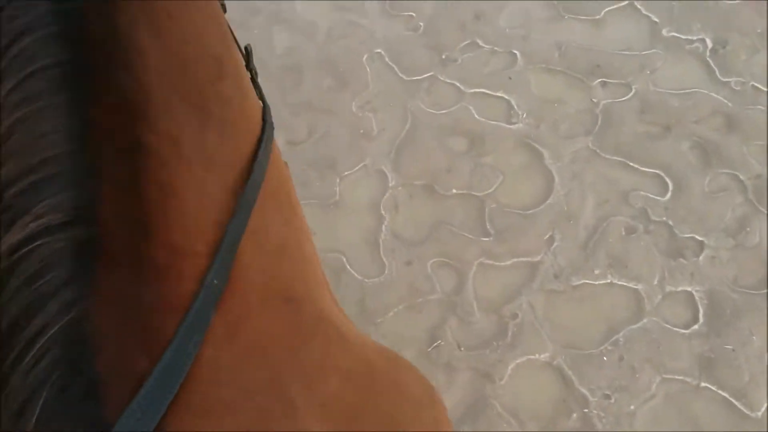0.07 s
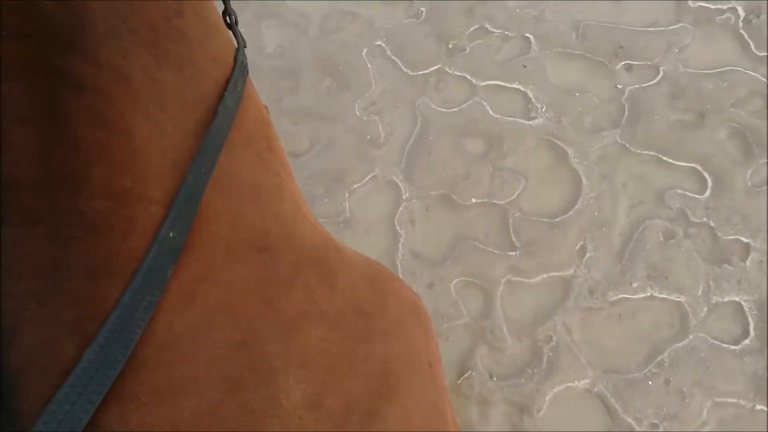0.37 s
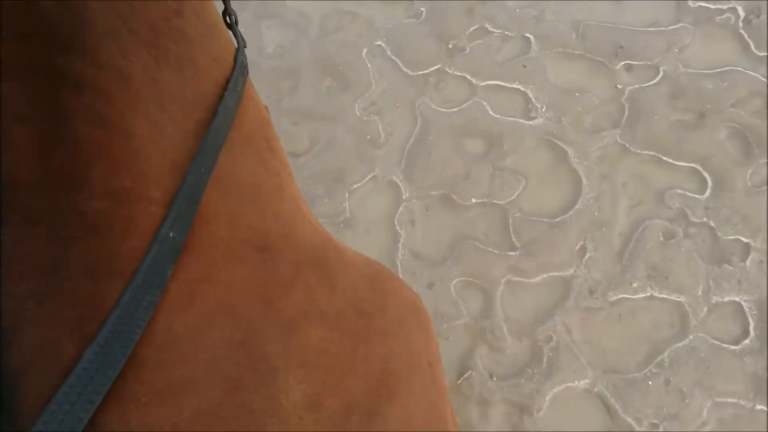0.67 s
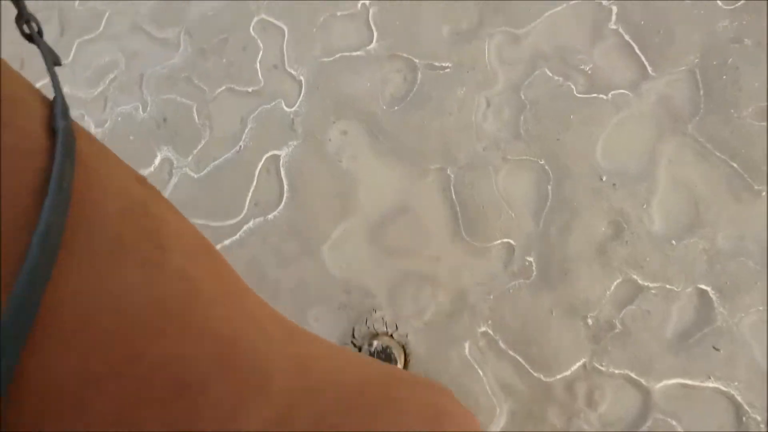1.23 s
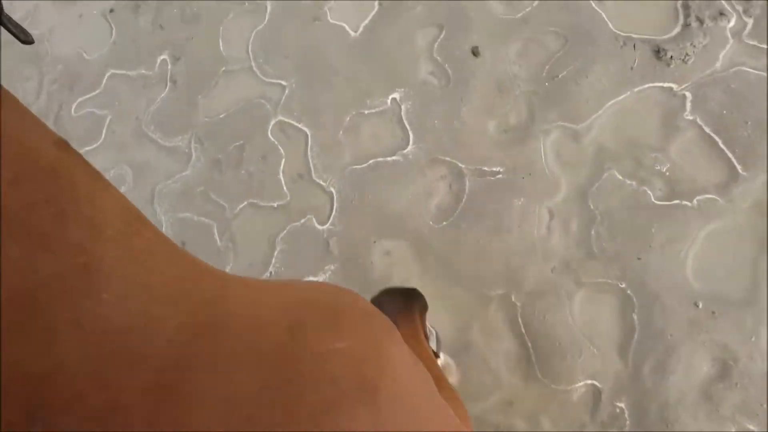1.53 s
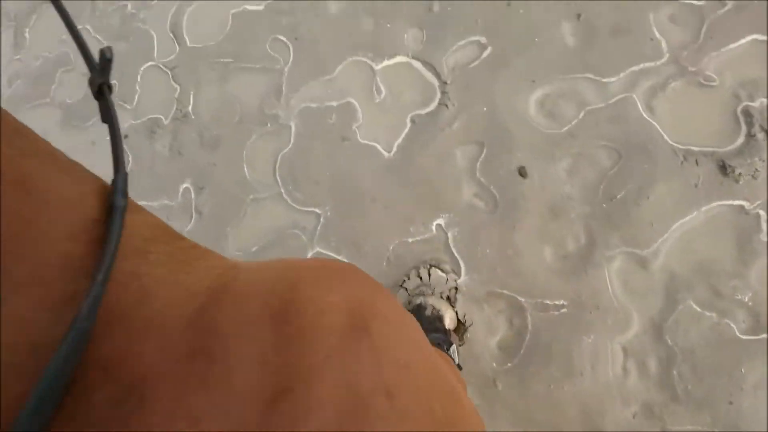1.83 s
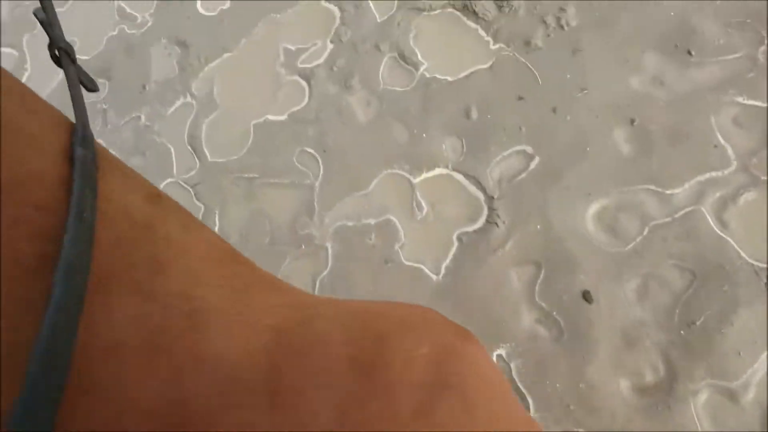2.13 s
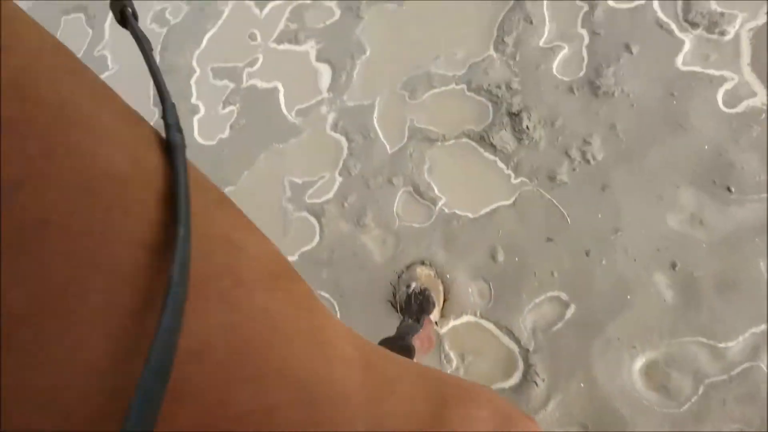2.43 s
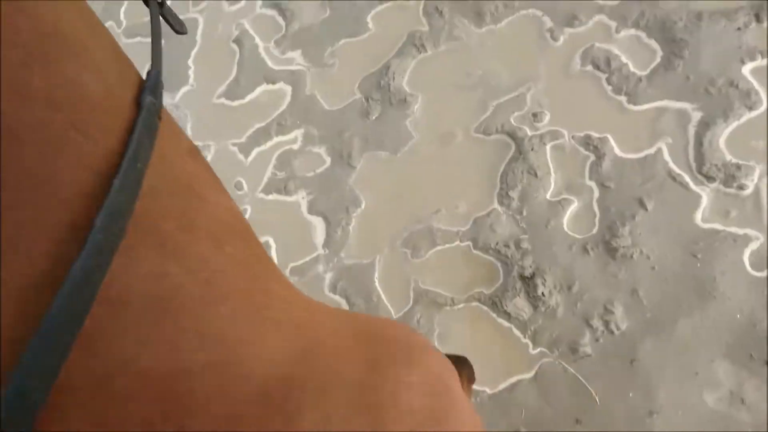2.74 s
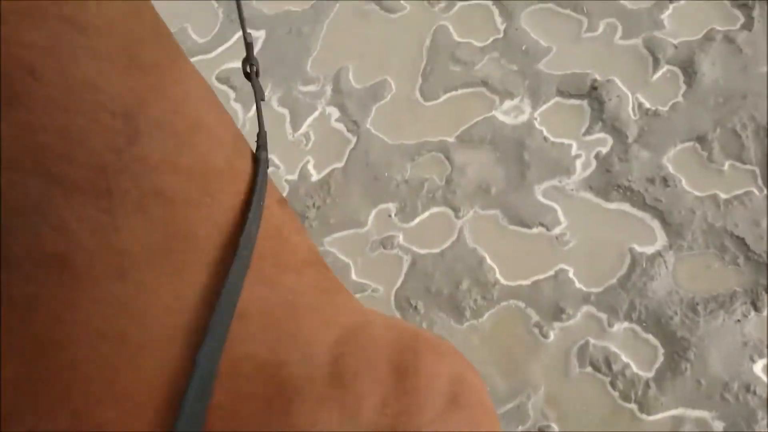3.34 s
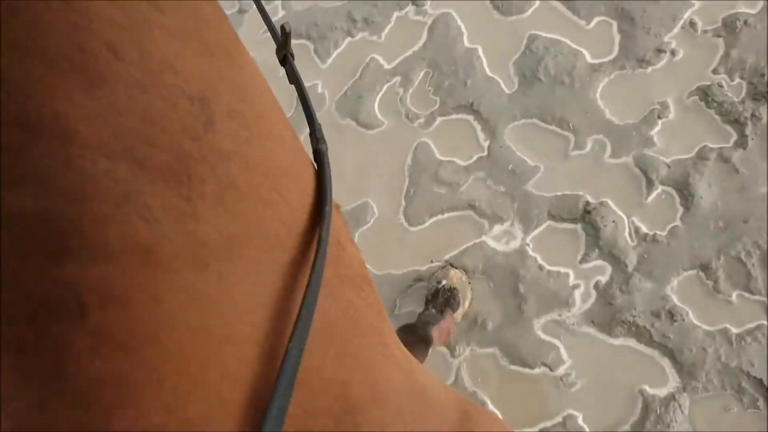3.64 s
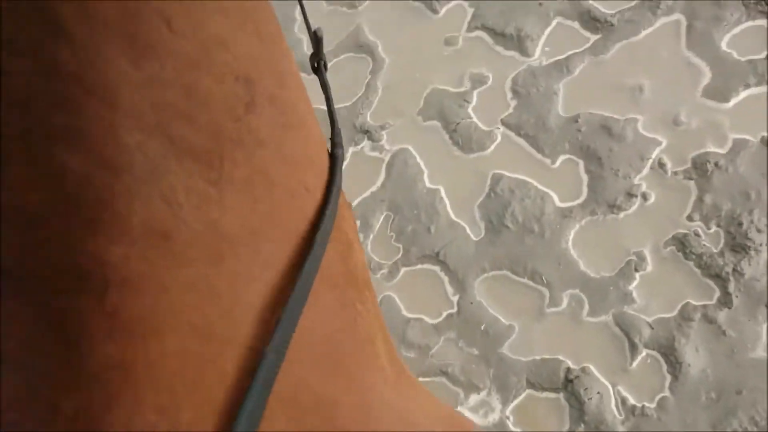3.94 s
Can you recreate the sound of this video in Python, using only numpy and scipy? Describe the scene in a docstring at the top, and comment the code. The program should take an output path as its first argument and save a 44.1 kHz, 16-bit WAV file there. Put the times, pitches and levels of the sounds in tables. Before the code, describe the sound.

Hooves walking in wet mud, sucking and plopping, with faint birds and a distant engine hum.

```python
"""A horse walks through wet mud, outdoors, heard from a stereo microphone at the saddle.
From the start, small birds chirp on the right over low rumbling air and a distant engine's hum.
Soft steps come first: the ground thuds, and hooves pulling free suck, crackle and plop.
At 1.2 s a fore hoof slaps shut a pocket of air and throws slurry. The engine swells at 2 and 3 s;
two more slaps land at 2.6 and 3.6 s, and the birds swing toward the middle as the rider turns."""
import sys
import numpy as np
from scipy import signal
from scipy.io import wavfile

SR = 44100
rng = np.random.default_rng(int(sys.argv[2]) if len(sys.argv) > 2 else 0)


def materialize(psi):
    """Save the field psi as 16-bit PCM at rate SR to the path in sys.argv[1].

    A 1-D psi becomes a single channel; in a 2-D psi each row is a channel.
    """
    bounded = np.clip(np.atleast_2d(psi).T, -1, 1)
    quanta = np.round(bounded * 32767).astype(np.int16)
    wavfile.write(sys.argv[1], SR, quanta)


N = 176400
T = np.arange(N) / SR


def from_db(db):
    """Decibels to gain."""
    return 10 ** (np.asarray(db) / 20)


def unit_rms(x):
    """Scale to unit power."""
    return x / np.sqrt(np.mean(x ** 2) + 1e-20)


def at_hz(points, hz):
    """Read a spectrum on a log-frequency axis."""
    freqs, values = np.transpose(points)
    return np.interp(np.log(hz), np.log(freqs), values)


def in_time(points):
    """Read a curve at every sample."""
    return np.interp(T, *np.transpose(points))


def pan(db):
    """Left and right gains of mean 1; db is left minus right."""
    gains = from_db([[db / 2], [-db / 2]])
    return gains / gains.mean()


def drift(per_s, size=N):
    """Smooth random wander of spread about 1."""
    return np.interp(np.arange(size) / SR * per_s, np.arange(4096), rng.standard_normal(4096))


def stereo_pair(a, b, likeness):
    """Two unrelated signals become a partly alike left and right."""
    likeness = np.clip(likeness, -.99, .99)
    mid, side = np.sqrt(1 + likeness) * a, np.sqrt(1 - likeness) * b
    return np.array([mid + side, mid - side])


def add(out, start_s, x):
    """Mix a sound in at start_s."""
    i = int(round(start_s * SR))
    lo, hi = max(i, 0), min(i + x.shape[-1], N)
    out[..., lo:hi] += x[..., lo - i:hi - i]


def echoes(x, t60_s):
    """Diffuse scatter from the surroundings, different on each side of the microphone."""
    t = T[:SR // 2]
    tail = rng.standard_normal((2, len(t))) * from_db(-60 * t / t60_s) * (1 - np.exp(-t / .008))
    return signal.fftconvolve(x, tail / np.sqrt(np.sum(tail ** 2) / 2), axes=1)[:, :N]


# open air all around: freq_hz, band_level_db
AIR_SPECTRUM = [(40, -77.5), (60, -62), (95, -55.5), (170, -52.5), (260, -59.5), (400, -66), (750, -67),
                (1150, -60.5), (1700, -64), (2500, -63.5), (4500, -63), (6300, -70.5), (8500, -82),
                (15000, -84.5)]
# how alike it is on the two sides of the microphone: freq_hz, correlation
AIR_CORRELATION = [(60, 0.75), (300, 0.98), (700, 0.59), (1500, 0)]
# where it sits, mostly to the right: freq_hz, left_minus_right_db
AIR_BALANCE = [(60, -6.5), (200, -1.5), (1000, -5.5), (3000, -7.5), (6000, 0), (12000, 2)]


def air():
    """Outdoor rumble and faint hiss in third-octave bands that flicker on their own."""
    out, white = 0, rng.standard_normal((2, 2, N))
    for k, hz in enumerate(1000 * 2 ** (np.arange(-15, 13) / 3)):
        bandpass = signal.butter(2, [hz / 2 ** (1 / 6), hz * 2 ** (1 / 6)], "band", fs=SR, output="sos")
        band = stereo_pair(*signal.sosfilt(bandpass, white[k % 2]), at_hz(AIR_CORRELATION, hz))
        level_db = at_hz(AIR_SPECTRUM, hz) + 2.36 * drift(per_s=14)
        out += unit_rms(band) * pan(at_hz(AIR_BALANCE, hz)) * from_db(level_db)
    return out


# the far engine's slowly sinking note: time_s, pitch_hz
ENGINE_PITCH = [(1.2, 72), (1.85, 69), (3.75, 68.5), (4, 66)]
# its swells at the microphone: time_s, level_db
ENGINE_LEVEL = [(1.3, -53), (1.9, -50.5), (2.05, -45), (2.56, -46.5), (2.82, -53), (3.07, -41),
                (3.58, -46.5), (3.75, -42), (4, -44.5)]
# its harmonics: pitch_multiple, relative_db
ENGINE_HARMONICS = [(1, 1), (2, -13.5), (3, -23), (4, -25)]


def engine():
    """An engine far off to the right: a low hum with weak, wavering overtones."""
    phase = 2 * np.pi * np.cumsum(in_time(ENGINE_PITCH)) / SR
    hum = sum(from_db(db + 1.3 * k * drift(per_s=14)) * np.sin(k * phase) for k, db in ENGINE_HARMONICS)
    return np.sqrt(2) * hum * from_db(in_time(ENGINE_LEVEL)) * pan(db=-6.5)


# the outline of one chirp: time_s, pitch_hz, relative_db
CHIRP_SHAPE = [(0, 3490, 0), (.009, 4300, -4.5), (.018, 4730, 0), (.028, 4735, -6), (.038, 3670, 6.5),
               (0.042, 3920, 1), (0.049, 3420, -6.5), (.062, 4050, 1.5), (.072, 4500, -3.5),
               (.084, 3500, 2), (.10, 2876, -11.5)]


def chirp(level_db, pitch_ratio, distance_db):
    """A nearly pure tone that arches twice, with small kinks of its own, blurred by distance."""
    times, pitches, shape_db = np.transpose(CHIRP_SHAPE)
    t = T[:SR // 9]
    blur_hz = (70 + 17 * distance_db) * drift(900, len(t))
    kinks_hz = 80 * drift(130, len(t))
    hz = pitch_ratio * np.interp(t, times, pitches) + blur_hz + kinks_hz
    waver_db = 3.4 * drift(200, len(t))
    gain = from_db(level_db + np.interp(t, times, shape_db) + waver_db) * signal.windows.tukey(len(t), .1)
    return np.sqrt(2) * gain * np.sin(2 * np.pi * np.cumsum(hz) / SR)


# small birds, near and far: start_s, level_db, pitch_ratio
BIRD_CALLS = [(0.02, -60, 1.14), (0.299, -58, 1.11), (.415, -55, 1.12), (0.471, -62, 1.13),
              (0.71, -52, 0.96), (.85, -52.5, 1.01), (0.964, -41, 1), (1.404, -56.5, 1.28),
              (1.504, -54, 1.27), (1.555, -38.5, 0.96), (1.667, -55.5, 1.22), (1.807, -51.5, 1.03),
              (2.205, -51.5, 0.98), (2.315, -45, 0.97), (2.367, -52.5, 1.17), (2.73, -56, 1.05),
              (2.848, -53.5, 1.27), (3.038, -43.5, 1.045), (3.327, -52, 1.276), (3.624, -41, 1),
              (3.788, -52.5, 1.1), (3.945, -47, 0.99)]
# they swing toward the middle as the rider turns: time_s, left_minus_right_db
BIRD_BALANCE = [(2.4, -9.5), (3.0, -4.5)]
NEAR_BIRD_DB, RIGHT_LAG_S = -45, .0004


def birds():
    """Calls from the right; the fainter the bird, the further off, and the more it dissolves in scatter."""
    direct, scattered = np.zeros((2, N))
    for start_s, level_db, pitch_ratio in BIRD_CALLS:
        distance_db = max(NEAR_BIRD_DB - level_db, 0)
        scatter = from_db(-9 + .7 * distance_db)
        call = chirp(level_db, pitch_ratio, distance_db) / np.hypot(1, scatter)
        add(direct, start_s, call)
        add(scattered, start_s, scatter * call)
    sides = from_db(np.outer([.5, -.5], in_time(BIRD_BALANCE)))
    lagged = np.interp(T - RIGHT_LAG_S, T, direct)
    return sides * np.array([direct, lagged]) + echoes(sides * scattered, t60_s=.3)


# the colour of bursting mud: freq_hz, band_level_db
MUD_SPECTRUM = [(350, -5), (700, -13.5), (1050, -3), (1450, -3.5), (1780, -5.5), (2400, 0), (4000, 0.5),
                (6000, -15), (9000, -23), (15000, -38)]
# how it reaches the microphone: freq_hz, left_minus_right_db
MUD_BALANCE = [(1200, -0.5), (2500, -7), (4500, -6.5), (8000, 2.5), (12000, 31)]
MUD_Q, RING_WIDTH_OCTAVES, TREBLE_HZ, SQUELCH_BURSTS_PER_S = 6.7, .079, 4730, 2200
SPRAY_Q, SPRAY_FROM_HZ, SPRAY_LAG_S = 1.8, 6500, .0019


def mud_bursts(envelope, per_s, ring_hz, ring_db=8.5, treble_db=0):
    """Tiny bursts ring the mud's small cavities; the finest spray lags behind as a hiss."""
    n, centres = len(envelope), np.geomspace(350, 15000, 26)
    density = per_s / SQUELCH_BURSTS_PER_S
    bursts = (rng.random(n) < per_s / SR) * from_db(3.6 * np.minimum(rng.exponential(1, n), 3))
    drive = (bursts + .073 * density) * envelope  # a little noise fills the gaps
    pole = np.exp(-1 / (SPRAY_LAG_S * SR))
    spray = signal.lfilter([1 - pole], [1, -pole], envelope) * density
    ring = np.exp(-(np.log2(centres / ring_hz) / RING_WIDTH_OCTAVES) ** 2 / 2)
    shelf = 1 / (1 + (TREBLE_HZ / centres) ** 4)
    patchy_db = 4 * rng.standard_normal(len(centres))
    gains = from_db(at_hz(MUD_SPECTRUM, centres) + ring_db * ring + treble_db * shelf + patchy_db)
    cavities_hz = centres * rng.uniform(.95, 1.05, len(centres))
    out = 0
    for hz, gain in zip(cavities_hz, gains / np.linalg.norm(gains)):
        is_spray = hz > SPRAY_FROM_HZ
        kicks = stereo_pair(*rng.standard_normal((2, n)), likeness=.39) * (drive + spray * is_spray)
        cavity = np.concatenate(signal.iirpeak(hz, SPRAY_Q if is_spray else MUD_Q, SR))
        ringing = unit_rms(signal.sosfilt([cavity, cavity], kicks + 1e-18))
        out += gain * pan(at_hz(MUD_BALANCE, hz)) * ringing
    return out * np.sqrt(np.mean(envelope ** 2))


# mud creeps under a loaded hoof, faint from the saddle: centre_s, width_s, crackle_db, sizzle_db
OOZE_SWELLS = [(0.546, 0.11, -57, -60.5), (1.446, 0.037, -58.5, -62), (1.69, .07, -57, -59),
               (1.989, 0.025, -60.5, -56), (2.371, 0.12, -60, -59), (2.715, .05, -57.5, -59.5),
               (2.936, 0.098, -54, -56.5), (3.281, 0.06, -61, -59.5), (3.627, 0.075, -56.5, -58),
               (3.93, 0.084, -57.5, -58.5)]


def ooze():
    """Slow sticky crackle and a fine wet sizzle swell and fade as the weight shifts."""
    crackle, sizzle = np.zeros((2, N))
    for centre_s, width_s, crackle_db, sizzle_db in OOZE_SWELLS:
        swell = np.exp(-((T - centre_s) / width_s) ** 2 / 2)
        crackle += from_db(crackle_db) * swell
        sizzle += from_db(sizzle_db - 3) * swell
    return (mud_bursts(crackle, per_s=330, ring_hz=2036)
            + mud_bursts(sizzle, per_s=330, ring_hz=TREBLE_HZ, ring_db=0, treble_db=27))


def damped_tone(hz, t60_s, rise_s, glide_per_s=0):
    """A tone rings and dies; with a glide it rises in pitch like a closing pocket of air."""
    t = T[:SR // 3]
    tone = np.sin(2 * np.pi * hz * (t + glide_per_s * t * t / 2))
    return tone * (1 - np.exp(-t / rise_s)) * from_db(-60 * t / t60_s)


# the ground below the horse: start_s, level_db, pitch_hz
GROUND_THUDS = [(.183, -37.5, 161), (1.227, -33, 190), (0.303, -30.5, 77.3), (.575, -30.5, 155),
                (1.434, -28, 99.4), (1.52, -30.5, 110), (1.585, -32, 112), (1.665, -35.5, 179.6),
                (2.299, -37, 168), (3.242, -36, 152)]


def thuds():
    """Soft ground gives under the weight with a low, rounded note."""
    out = np.zeros(N)
    for start_s, level_db, hz in GROUND_THUDS:
        add(out, start_s, from_db(level_db + 4.5) * damped_tone(hz, t60_s=.12, rise_s=.016))
    return out


# larger bubbles around the hooves: start_s, level_db, pitch_hz
BUBBLE_PLOPS = [(.577, -39, 431), (.753, -39.5, 313), (.828, -41.5, 458), (.868, -39, 390),
                (1.010, -41.5, 570), (1.033, -39.5, 447.2), (2.628, -39, 733.6), (1.133, -41, 570),
                (1.310, -47, 431), (1.576, -38.5, 518), (3.41, -44, 400), (1.896, -43, 556),
                (1.930, -40, 445), (2.065, -37, 440), (2.120, -44, 495), (2.302, -39.5, 437),
                (2.814, -38, 469), (2.966, -41, 464), (3.026, -42, 398), (3.239, -43, 444),
                (3.605, -30, 714), (3.738, -45.5, 413), (3.846, -43, 456)]
BUBBLE_GLIDE_PER_S = 6.2


def plops():
    """Each bubble rings briefly with one weak overtone, rising as it closes."""
    out = np.zeros(N)
    for start_s, level_db, hz in BUBBLE_PLOPS:
        low, high = [damped_tone(f, t60_s=.022, rise_s=.00067, glide_per_s=BUBBLE_GLIDE_PER_S)
                     for f in (hz, 1.58 * hz)]
        add(out, start_s, from_db(level_db + 6.5) * (low - from_db(-13.5) * high))
    return out


# wet mud bursts into tiny bubbles, a horse's height below the microphone:
# peak_s, level_db, rise_s, fall_s, ring_hz, treble_db, left_minus_right_db
MUD_SQUELCHES = [(0.184, -53, 0.00084, 0.0037, 11000, 38, -3), (0.239, -31, 0.0016, 0.0028, 1205, -10, 2),
                 (.254, -31.5, 0.009, 0.01, 2070, 20, -3.5), (.578, -42, 0.00073, 0.0097, 1930, -6, 5),
                 (0.619, -39, 0.00079, 0.0053, 1950, -6, 4), (.828, -38, 0.00044, 0.0028, 3160, 10, 5),
                 (0.8562, -36.5, .0006, 0.0017, 2850, 13, 3), (0.867, -28, 0.001, 0.0012, 1230, 8.5, -1),
                 (1.133, -42, 0.0005, 0.0022, 2630, 3, -2), (1.228, -29, 0.0032, 0.0086, 1380, 10.5, 7),
                 (1.2399, -24.5, 0.00038, 0.0012, 3050, -12, -20), (1.258, -30.5, 0.01, 0.0032, 2890, 0, 1),
                 (1.2787, -26.5, 0.00089, 0.0021, 1450, 12, 2.5),
                 (1.286, -29, 0.00038, 0.0014, 2820, -6, -5), (1.296, -30.5, .0005, 0.0016, 3030, 0, 4),
                 (1.645, -42.5, 0.0018, 0.042, 1368, -8, -1), (1.673, -29.5, 0.0025, 0.0033, 2670, 2, -3.5),
                 (1.896, -40, .0005, 0.0019, 1394, -3, 3), (1.930, -41.5, 0.00032, 0.003, 2650, -1, 10),
                 (2.3025, -31.5, 0.00076, 0.0043, 2080, 11.5, -0.5),
                 (2.419, -40.5, 0.00054, 0.0026, 2920, 20, -1), (2.627, -25.5, 0.0018, 0.0071, 976, 15, 4),
                 (2.642, -36, 0.0064, 0.018, 1400, 12, -5), (2.666, -26.5, 0.00084, 0.007, 1230, 10, 0),
                 (2.6769, -35.5, 0.00082, 0.0022, 1100, 27, 0), (2.688, -33, 0.003, 0.015, 1340, 11, 1.5),
                 (2.899, -34.5, 0.00029, 0.0035, 2970, 25, -3.5),
                 (2.969, -35, 0.0008, 0.007, 1450, 21.5, -3), (3.246, -37.5, 0.0083, 0.0093, 1310, 19, 2),
                 (3.56, -31, 0.0016, 0.004, 2520, 12, 4), (3.588, -37, 0.02, 0.031, 1380, 4, 2),
                 (3.607, -25, 0.00063, 0.0043, 1340, -12, 1), (3.882, -42.5, 0.0087, 0.02, 1400, 13, -1),
                 (3.8961, -30.5, 0.00039, 0.0024, 3500, 22.5, 1.5)]


def squelches():
    """Each squelch swells and dies as a spray of bursts; an abrupt one is mostly one bubble popping."""
    out, lead_s = np.zeros((2, N)), .05
    t = T[:SR // 6] - lead_s
    for peak_s, level_db, rise_s, fall_s, ring_hz, treble_db, pan_db in MUD_SQUELCHES:
        envelope = np.exp(np.minimum(t / rise_s, -t / fall_s))
        gain = from_db(level_db - 1) * pan(pan_db)
        slurry = mud_bursts(envelope, SQUELCH_BURSTS_PER_S, ring_hz, treble_db=treble_db)
        add(out, peak_s - lead_s, gain * slurry)
        abruptness = np.exp(-rise_s / .0015)
        pop = from_db(17) * damped_tone(ring_hz, t60_s=.006, rise_s=.0009, glide_per_s=BUBBLE_GLIDE_PER_S)
        add(out, peak_s, gain * pan(at_hz(MUD_BALANCE, ring_hz)) * abruptness * pop)
    return out


# fore hooves land flat, just ahead of the saddle: start_s, level_db, pitch_hz, t60_s, thud_relative_db
HOOF_SLAPS = [(1.2265, -20, 423, 0.02, 0), (2.6266, -19, 341, 0.02, -26.5), (3.5613, -22, 437, 0.019, -22)]
# the ring of the trapped air: pitch_ratio, relative_db, t60_ratio
POCKET_MODES = [(1, 2.5, 1.0), (1.3, -12, 1.2), (2.2, -6, .9), (2.8, -13, 1.3)]


def slaps():
    """A hoof shuts a pocket of air, which rings and rises in pitch over a short thud."""
    out = np.zeros(N)
    for start_s, level_db, hz, t60_s, thud_db in HOOF_SLAPS:
        for pitch_ratio, mode_db, t60_ratio in POCKET_MODES:
            mode = damped_tone(hz * pitch_ratio, t60_s * t60_ratio, rise_s=.0015, glide_per_s=13.5)
            add(out, start_s, from_db(level_db + mode_db + 5) * mode)
        add(out, start_s, from_db(level_db + thud_db) * damped_tone(hz=200, t60_s=.031, rise_s=.0015))
    return out


def scene():
    """Close steps with their faint scatter, among birds, engine and air."""
    hooves = (thuds() + plops() + slaps()) * pan(db=-4)
    steps = squelches() + ooze() + hooves
    return steps + from_db(-13) * echoes(steps, t60_s=.14) + birds() + engine() + air()


def record(dry, cutoff_hz=15800):
    """The microphone's signal is cut steeply at the top."""
    return signal.sosfilt(signal.ellip(10, .2, 90, cutoff_hz, fs=SR, output="sos"), dry)


dry = scene()
out = record(dry)
materialize(out)
```